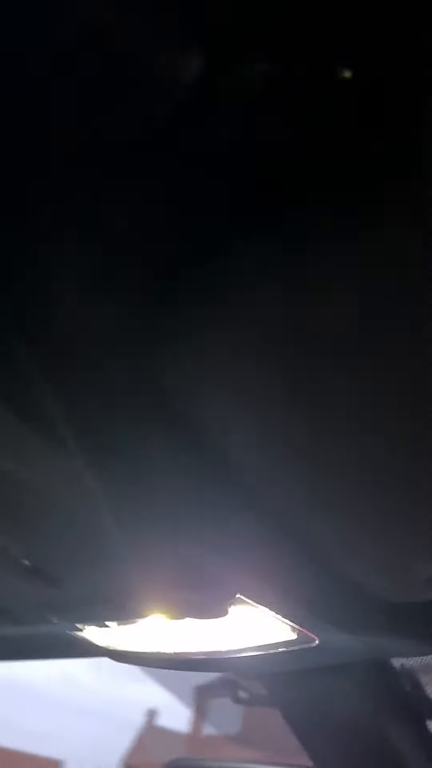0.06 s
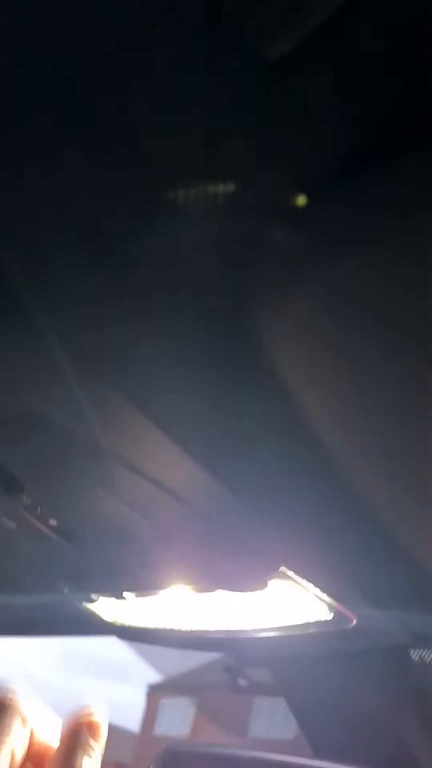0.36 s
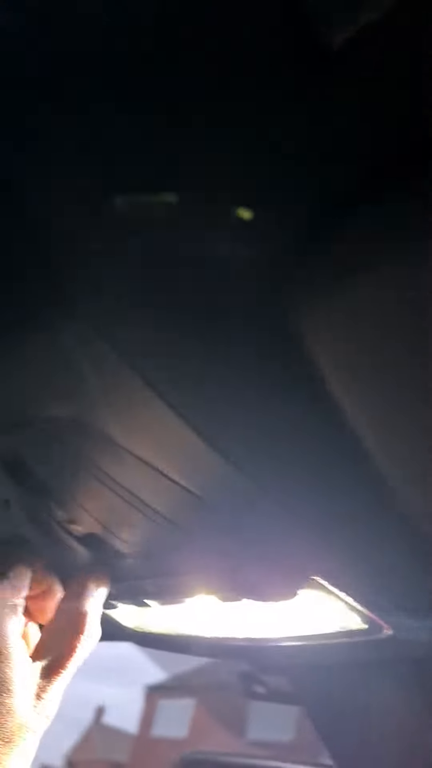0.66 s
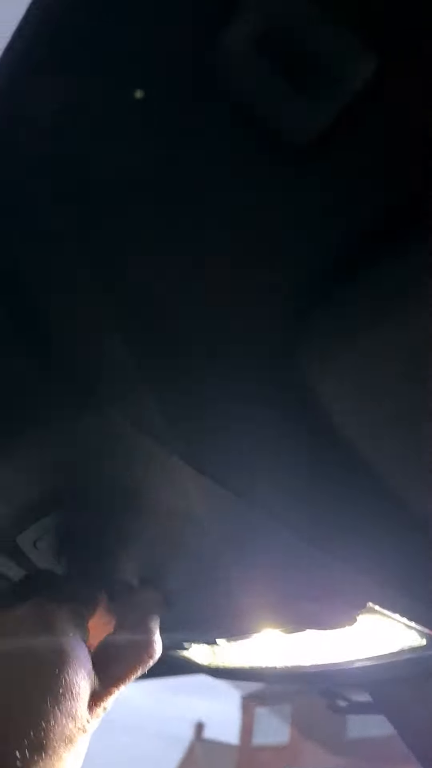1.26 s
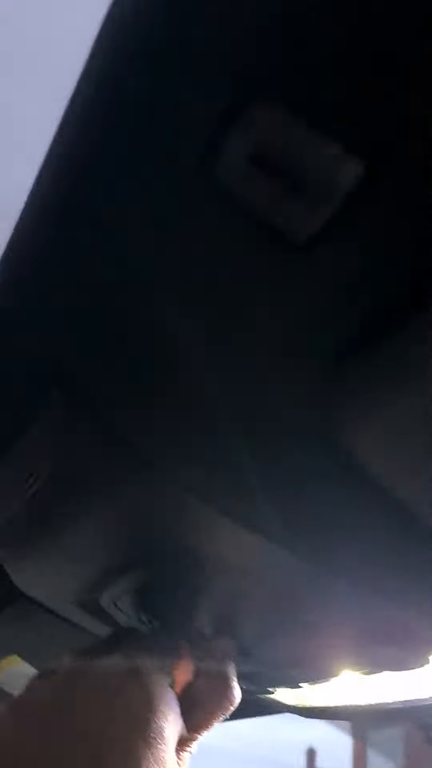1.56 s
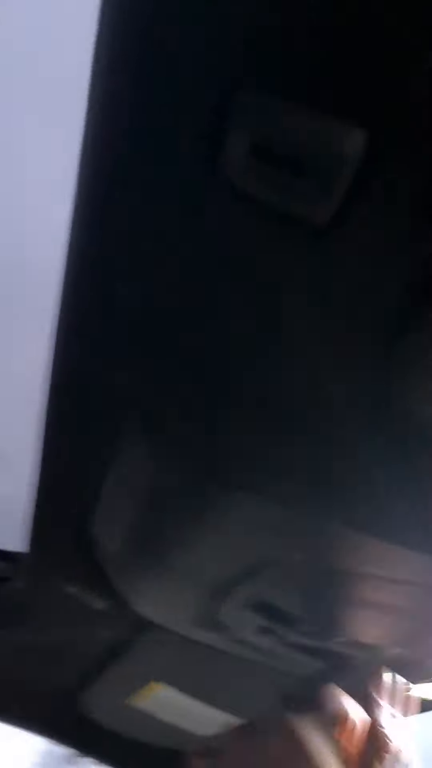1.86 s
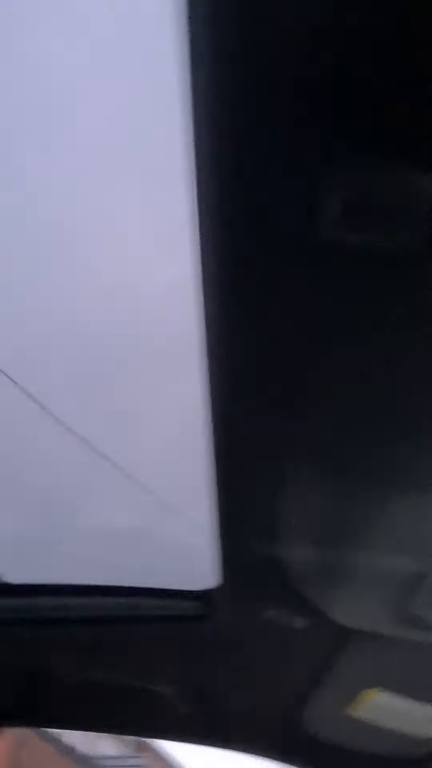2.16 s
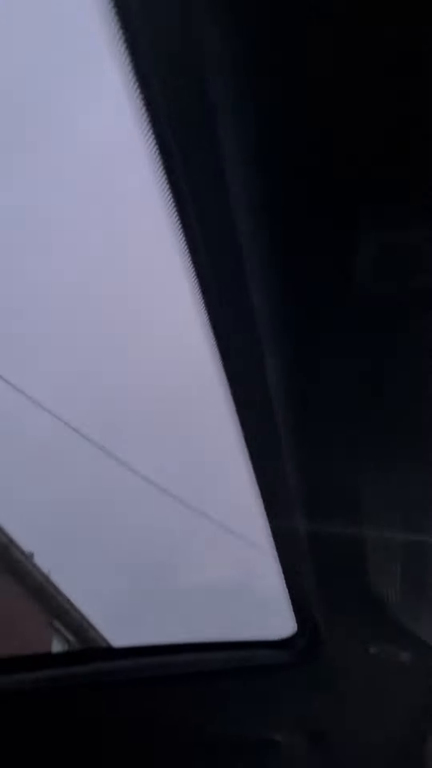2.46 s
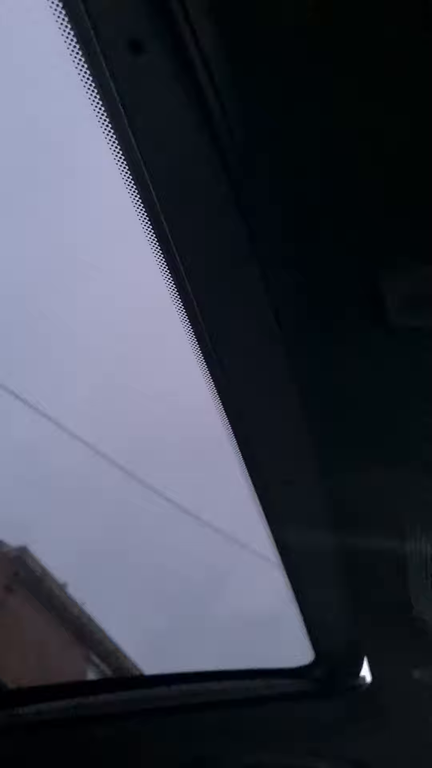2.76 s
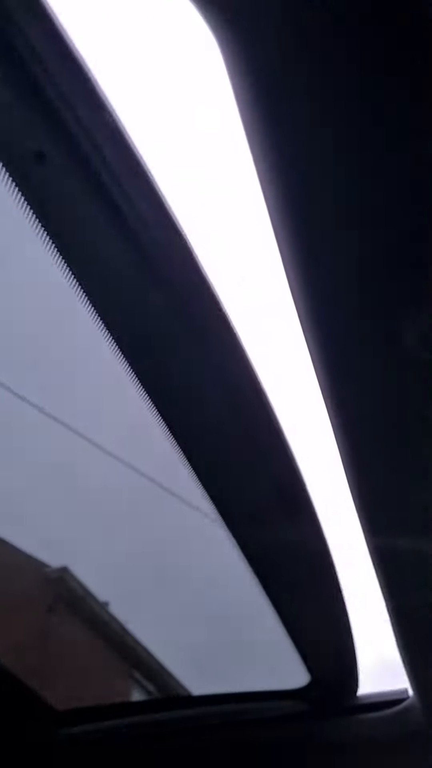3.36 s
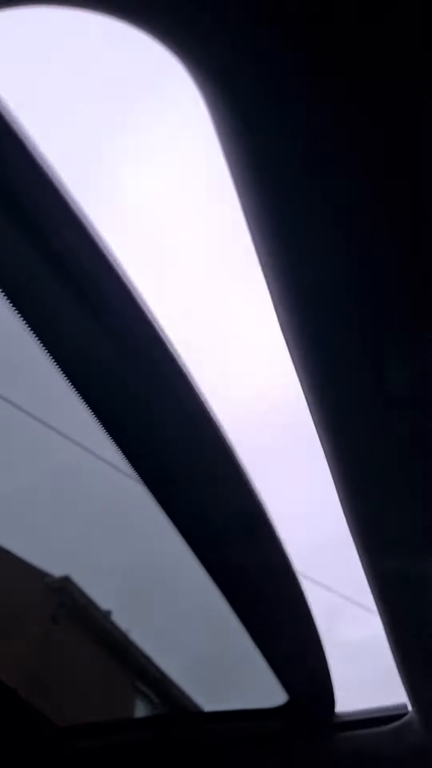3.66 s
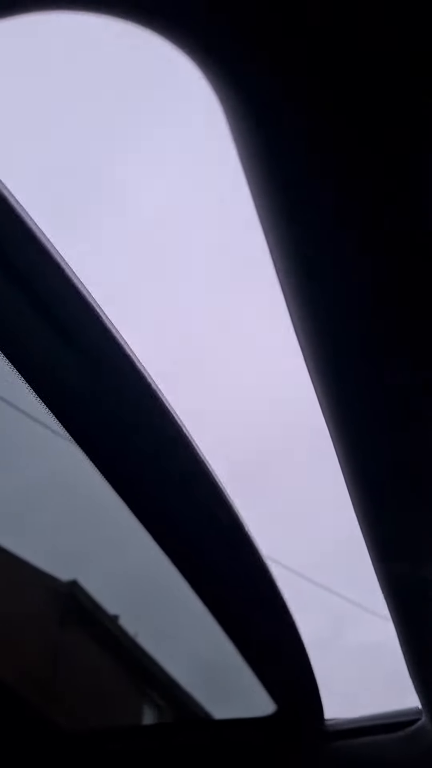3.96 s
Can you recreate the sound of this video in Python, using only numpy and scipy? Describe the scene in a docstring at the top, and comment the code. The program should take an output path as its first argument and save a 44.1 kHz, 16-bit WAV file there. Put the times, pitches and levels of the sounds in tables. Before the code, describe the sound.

An electric sunroof opens inside a parked car, its idling engine booming low throughout. A sleeve rustles faintly, and from 0.7 seconds fingers tap and brush the overhead console, clicking a switch around 1.4 seconds. At 1.6 seconds the motor starts with a clunk, and the latch snaps loudly near 1.9. The seal swishes at 2.2 seconds, then the panel slides with a soft whine and hiss until 4 seconds.

```python
"""Inside a parked car, the idling engine makes the cabin boom. A sleeve rustles upward, brightening as the hand
rises, and from 0.66 s fingers tap the roof console, then click its switch. At 1.6 s the sunroof motor starts
with a clunk, and the panel snaps out of its latch. The seal lets go with a swish as the opening roof vents the
lowest boom. The panel slides back to the end, its gears whining over the hiss of the guide rails."""
import sys
import numpy as np
from scipy import signal
from scipy.fft import rfft, irfft
from scipy.io import wavfile
from scipy.ndimage import map_coordinates

SR = 44100
rng = np.random.default_rng(int(sys.argv[2]) if len(sys.argv) > 2 else 0)


def to_wav(sig):
    """Store sig (one row per channel, or 1-D mono) as 16-bit WAV at the path in sys.argv[1].

    Samples outside -1..1 are clipped; the rate is SR.
    """
    pcm = np.clip(np.atleast_2d(sig), -1, 1) * 32767
    pcm = np.round(pcm).astype(np.int16)
    wavfile.write(sys.argv[1], SR, pcm.T)  # frames by channels


N = 176400
T = np.arange(N) / SR
FREQS = np.maximum(np.fft.rfftfreq(2 * N, 1 / SR), 1)
TOP_HZ = 16100


# Pitch of the gears. Each row: time in seconds, tooth mesh rate in Hz.
MESH_RATE = [(1.61, 380), (1.7, 445), (1.95, 438), (2.3, 464), (2.55, 461), (2.75, 454), (3.0, 450),
             (3.27, 436), (3.45, 438), (3.62, 447), (3.8, 458), (4.0, 452)]
# Panning of the roof. Each row: frequency in Hz, left minus right in dB.
ROOF_PAN = [(200, 5), (700, -1), (1300, -2), (2400, -4), (4400, -10), (8000, 1.5), (15000, -11.5)]
def sunroof(speed_waver=0.00094):
    """The motor turns its gears, pulling the panel off its seal and along the rails."""
    mesh_cycles = np.cumsum(curve(MESH_RATE) * (1 + speed_waver * walk(14))) / SR
    rasp = shaft_rasp(mesh_cycles)
    noise = drive_noise(rasp) + rail_hiss(rasp) + seal_swish()
    roof = gear_whine(mesh_cycles) + shoe_rubs() + rail_ring() + reflected(noise)
    left_gain = np.sqrt(shape(ROOF_PAN))
    return filtered(roof, np.array([left_gain, 1 / left_gain]))


# Whine envelopes. Each row: time in seconds, then the levels of mesh harmonics 1, 2 and 3 in dB.
WHINE_LEVELS = [(1.61, -50, -47, -70), (2.3, -63, -77, -66), (2.85, -53, -59.5, -60), (3.3, -51, -58, -58),
                (3.55, -51.5, -53.5, -67), (3.8, -56.5, -53, -74), (4.0, -56, -56.5, -55)]
def gear_whine(mesh_cycles, flutter_per_s=50, flutter_cycles=.035, flutter_db=2.5, waver_db=4.5):
    """Harmonics of the mesh rate flutter with the uneven bite of the teeth."""
    out, rows = 0, np.array(WHINE_LEVELS)
    bite = mesh_cycles + flutter_cycles * walk(flutter_per_s)
    for k in range(1, rows.shape[1]):
        offset = rng.uniform(0, 1) + np.array([[0], [.25]])  # sides a quarter cycle apart
        level_db = curve(rows[:, [0, k]]) + waver_db * walk(13) + flutter_db * walk(flutter_per_s)
        out = out + np.sqrt(2) * undb(level_db) * np.sin(2 * np.pi * (k * bite + offset))
    return out * (T > LATCH_HITS[0][0])  # silent until the first clunk


def shaft_rasp(mesh_cycles, teeth=8):
    """A rough pattern repeats with every turn of the shaft."""
    roughness = rng.standard_normal((2, 700))
    position = mesh_cycles / teeth % 1 * roughness.shape[1]
    return spread(*[map_coordinates(row, [position], mode="grid-wrap") for row in roughness])


# Colour of the drive. Each row: frequency in Hz, relative level in dB.
DRIVE_EQ = [(100, 3), (200, -1.5), (330, 0.5), (450, -10.5), (560, -2.5), (800, -6), (1150, -5),
            (1600, -14), (3000, -15.5), (4500, -23), (7000, -40), (9000, -41), (15000, -51.5)]
# Its envelope under load. Each row: time in seconds, level in dB.
DRIVE_LEVEL = [(1.6, -71), (1.625, -33.5), (1.72, -38), (1.8, -36.5), (1.85, -28), (1.92, -40),
               (1.97, -39.5), (2.1, -39.5), (2.16, -38), (2.22, -41), (2.8, -45), (3.35, -45), (4.0, -44.5)]
def drive_noise(rasp, rasp_db=-3.5):
    """The drive buzzes, loudest as it strains against the latch."""
    return coloured(air() + undb(rasp_db) * rasp, DRIVE_EQ) * undb(curve(DRIVE_LEVEL) + 1.75 * walk(45))


# Colour of the rails. Each row: frequency in Hz, relative level in dB.
RAIL_EQ = [(500, -3.5), (1500, -0.5), (2800, 3), (4500, -1), (6000, -2), (7200, -13), (8400, -22),
           (9300, -19), (10500, -14.5), (15500, -27)]
# Envelope of the slide. Each row: time in seconds, level in dB.
SLIDE_LEVEL = [(1.6, -90), (2.05, -68), (2.25, -51), (2.65, -47), (3.1, -49), (4.0, -49)]
def rail_hiss(rasp, rasp_db=-19):
    """The sliding panel hisses on its rails, with a trace of shaft rasp."""
    return coloured(air() + undb(rasp_db) * rasp, RAIL_EQ) * undb(curve(SLIDE_LEVEL) + 0.53 * walk(60))


def rail_ring(count=18, low_hz=1601, high_hz=4666, width_hz=60, swell_db=7, against_hiss_db=-9):
    """Narrow resonances of the rails swell and fade as the shoes travel along them."""
    out = 0
    for hz in np.geomspace(low_hz, high_hz, count) * (1 + .02 * rng.standard_normal(count)):
        grain = np.array([walk(width_hz) + 1j * walk(width_hz) for side in range(2)])
        tone = (grain * np.exp(2j * np.pi * hz * T)).real
        out = out + tone * undb(swell_db * np.tanh(walk(11))) / hz
    return unit(out) * undb(curve(SLIDE_LEVEL) + against_hiss_db)


# Faint squeaks. Each row: centre in seconds, half-length in seconds, pitch in Hz, level in dB.
SHOE_RUBS = [(2.27, 0.1, 4130, -54.5), (2.496, .07, 2890, -60), (2.955, 0.031, 2640, -56),
             (3.065, 0.075, 2640, -54.5)]
def shoe_rubs(width_hz=59):
    """The guide shoes sing briefly on the rails in narrow bands of noise."""
    out = 0
    for centre_s, half_s, hz, db in SHOE_RUBS:
        tone = unit(filtered(air(), 1 / (1 + ((FREQS - hz) / width_hz) ** 2)))
        out = out + tone * undb(db) * np.exp(-((T - centre_s) / half_s) ** 2)
    return out


# Colour of the seal. Each row: frequency in Hz, relative level in dB.
SEAL_EQ = [(1000, -11), (2500, -5), (3900, -9), (5200, -16), (9000, -42)]
def seal_swish(centre_s=2.21, half_s=0.05, level_db=-45.5):
    """The seal swishes as it lets go of the glass."""
    return coloured(air(), SEAL_EQ) * undb(level_db) * np.exp(-((T - centre_s) / half_s) ** 2)


# Clunks. Each row: start in seconds, body, mid, treble and top levels in dB, left minus right in dB.
LATCH_HITS = [(1.6135, -35, -44, -36, -45.5, -7.5), (1.624, -50, -42, -52, -65, -1),
              (1.665, -32, -41.5, -49.5, -70, 0), (1.793, -36, -31.5, -35.5, -46.5, -4),
              (1.823, -55, -51, -49, -55, -2), (1.846, -51, -38, -39, -62, 7),
              (1.869, -50, -31, -23, -31, -2), (1.887, -32, -27.5, -26, -29.5, -2),
              (1.9015, -25.5, -22.5, -33.5, -49, -1.5), (1.977, -36.5, -37, -35, -56, -3),
              (2.136, -40, -41.5, -58, -77, 2), (2.164, -47, -48, -57, -75, 3)]
# Ring of the latch. Each row: frequency in Hz, width in Hz, boost in dB.
LATCH_RING = [(276, 280, 4.9), (437, 52, 14.6), (1107, 54, 14), (1306, 100, 11.6), (1460, 71, 7.2),
              (2980, 970, 12.6), (4200, 1300, 12.7), (5500, 1300, 10.5), (8550, 69, 3.2)]
def latch_clunks():
    """The drive engages, the latch snaps and the released panel knocks."""
    return knocks(LATCH_HITS, LATCH_RING, snap_db=-2, tail_stretch=1.22)


# Taps. Each row: start in seconds, body, mid, treble and top levels in dB, left minus right in dB.
SWITCH_HITS = [(.661, -38, -44, -49.5, -76, -2.5), (.6665, -37, -48, -59, -82, -7),
               (.671, -45, -39, -47.5, -72, -2.5), (.975, -50, -49, -67, -89, -6),
               (1.247, -51, -50.5, -42, -75, -6.5), (1.330, -40.5, -43.5, -50, -66, -4.5),
               (1.4065, -47, -41, -31.5, -33, -3.5), (1.511, -32.5, -36, -45.5, -64, -6.5)]
# Ring of the console. Each row: frequency in Hz, width in Hz, boost in dB.
CONSOLE_RING = [(467, 42, 1), (767, 30, 9), (1250, 390, 15.5), (3150, 1400, 19.5), (4150, 520, 14),
                (4780, 1000, 22.5), (5920, 610, 17.5), (7260, 270, -2)]
def switch_clicks():
    """Finger taps and switch clicks ring through the roof console."""
    return knocks(SWITCH_HITS, CONSOLE_RING, snap_db=-5.5, tail_stretch=1.0)


# Voicing of a knock. Each list runs body, mid, treble, top. In turn: band centre in Hz, tail decay in
# seconds before stretching, crack against the tail in dB, click against the tail in dB before snap_db.
BAND_HZ = [350, 1250, 4500, 12000]
BAND_T60_S = [0.12, 0.067, 0.077, 0.08]
BAND_CRACK_DB = [-31, -8.5, -0.5, -2]
BAND_CLICK_DB = [4.8, 12, 22, 28]
def knocks(hits, modes, snap_db, tail_stretch, crack_s=0.0015, left_lag_s=.00015):
    """Each blow is a click, a brief crack and a short cabin tail, rung through the struck part."""
    ring = 1 + sum((undb(db) - 1) / (1 + (2 * (FREQS - hz) / width) ** 2) for hz, width, db in modes)
    edges = np.sqrt(np.array(BAND_HZ[:-1]) * BAND_HZ[1:])
    age, out = T[:SR // 4], 0
    for k, (low, high) in enumerate(zip([190, *edges], [*edges, TOP_HZ])):
        power, clicks = np.zeros((2, 2, N))
        tail = np.exp(-np.log(1000) * age / (tail_stretch * BAND_T60_S[k]))
        crack = undb(BAND_CRACK_DB[k]) * np.exp(-age / crack_s)
        for start, *band_db, pan_db in hits:
            i = int(start * SR)
            size = undb(band_db[k] + np.array([pan_db, -pan_db]) / 2)
            power[:, i:i + len(age)] += np.outer(size, tail + crack) ** 2
            clicks[[0, 1], [i + int(left_lag_s * SR), i]] += size * undb(BAND_CLICK_DB[k] + snap_db)
        band = ring / np.sqrt((1 + (low / FREQS) ** 10) * (1 + (FREQS / high) ** 10))
        out = out + filtered(clicks + air() * np.sqrt(power), causal(unit(band)))
    return out


# Pitched knocks. Each row: start in seconds, pitch in Hz, peak level in dB, attack in seconds.
THUMP_HITS = [(0.664, 53.7, -26, 0.024), (.667, 1263, -36, 0.0045), (1.332, 460, -30, 0.0033),
              (1.5093, 1292, -26, 0.0023), (1.513, 719, -37, .006), (1.516, 277, -32.5, 0.0068),
              (1.6145, 290, -18.3, 0.0033), (1.6233, 1110, -24.5, 0.0016), (1.631, 140, -42, 0.025),
              (1.783, 346, -27.5, 0.0033), (1.833, 373, -27.5, 0.013), (1.865, 130.4, -29, 0.019),
              (1.882, 42.6, -30, 0.045), (1.886, 5720, -27.5, 0.0042), (2.001, 35.8, -30, 0.058),
              (2.136, 630, -39, 0.0029), (2.14, 241, -36, 0.012)]
def thumps():
    """Roof lining, console, latch and spring each swing at their own pitch when pushed, then die away."""
    out = 0
    for start, hz, db, attack_s in THUMP_HITS:
        age = np.maximum(T - start, 0)
        envelope = age / attack_s * np.exp(1 - age / attack_s)
        out = out + undb(db) * envelope * np.sin(2 * np.pi * hz * age)
    return out


# Colour of the brighter rustle. Each row: frequency in Hz, relative level in dB.
GRAIN_EQ = [(900, -19), (2400, -14), (3250, 5.5), (3900, 1.5), (4800, 4), (5600, -3.5), (7000, -10.5),
            (8200, -12), (9200, -34), (10500, -23), (15000, -24)]
def sleeve_grain(start_s=0.81, end_s=1, fade_s=0.014, level_db=-54.5):
    """The sleeve rustles brighter as the hand rises, catching and slipping on its grain."""
    touch = (np.tanh((T - start_s) / fade_s) - np.tanh((T - end_s) / fade_s)) / 2
    scratch = air() * undb(3.5 * walk(200))
    return coloured(reflected(scratch), GRAIN_EQ) * touch * undb(level_db + walk(59))


# Colour of the cloth. Each row: frequency in Hz, relative level in dB.
SLEEVE_EQ = [(600, -5), (1500, -0.5), (2400, 1), (3300, 0.5), (4800, -4.5), (6200, -10.5), (7200, -28.5),
             (9200, -18.5), (10200, -14), (11500, -20), (15000, -28)]
# Its envelope. Each row: time in seconds, level in dB.
SLEEVE_LEVEL = [(0, -71.5), (.25, -67), (.35, -64.5), (.62, -59.5), (.75, -60.5), (.95, -54.5), (1.02, -94),
                (1.2, -64), (1.6, -66)]
def sleeve_rustle():
    """Cloth rustles as the arm reaches up."""
    return coloured(reflected(air()), SLEEVE_EQ) * undb(curve(SLEEVE_LEVEL) + 2.3 * walk(42))


# Cabin boom. Each row: multiple of the firing rate, relative level in dB.
BOOM_HARMONICS = [(1, -1.5), (2, 1), (3, -1.36), (4, -7), (6, -9), (7, -11), (10, -22.5), (11, -27.5),
                  (13, -22.5)]
# Bed of engine and fan noise. Each row: frequency in Hz, relative level in dB.
CABIN_EQ = [(20, 5.5), (45, 7), (100, 0), (200, -6.5), (380, -7), (550, -18), (1000, -26.5), (2000, -37),
            (4500, -42), (6500, -58.5), (9000, -75), (16000, -59)]
def engine_idle(firing_hz=28.85, resonance_hz=102, width_hz=8, boom_db=-32, rush_db=-39.5, vent_db=-10):
    """Even firings make the cabin boom and its noise throb; the lowest tone leaks out of the open roof."""
    firings = np.cumsum(firing_hz * (1 + 0.0005 * walk(2.3))) / SR - firing_hz * .0003
    opened = curve([(1.95, 0), (2.45, 1)])
    right_lag = 2 * np.pi * firing_hz * np.array([[0], [0.00052]])
    boom = 0
    for k, db in BOOM_HARMONICS:
        hz = k * firing_hz
        # harmonics above the cabin's resonance swing the other way
        lag = np.arctan2(width_hz * hz, resonance_hz ** 2 - hz ** 2) + right_lag
        level_db = db + vent_db * opened * (k == 1) + 0.6 * walk(7.4)
        boom = boom - undb(level_db) * np.cos(2 * np.pi * k * firings - lag)
    rush = coloured(air(), CABIN_EQ) * (1 + 0.12 * np.cos(2 * np.pi * firings))
    pan_db = np.array([[-.25], [.25]])
    return undb(boom_db + pan_db) * unit(boom) + undb(rush_db) * rush


def reflected(x, echo_db=-15.5, span_s=.014):
    """Early echoes from glass and trim ripple the spectrum, differently on each side."""
    taps = [pulses(rng.uniform(0.00087, span_s, size=24), rng.standard_normal(24)) for side in range(2)]
    taps = np.array([tap / np.linalg.norm(tap) for tap in taps])
    return x + undb(echo_db) * filtered(x, rfft(taps, 2 * N))


def air():
    """Diffuse white noise in the cabin."""
    return spread(*rng.standard_normal((2, N)))


def spread(mid, side, corner_hz=450, width=0.97, bass_share=0.3):
    """Two channels, alike in the bass and diffuse in the treble."""
    side_gain = width * (FREQS ** 2 + bass_share * corner_hz ** 2) / (FREQS ** 2 + corner_hz ** 2)
    side = filtered(side, side_gain)
    return np.array([mid + side, mid - side])


def undb(db):
    """Decibels to gain."""
    return 10 ** (np.asarray(db) / 20)


def unit(x):
    """Scale to rms 1."""
    return x / np.sqrt(np.mean(x ** 2))


def curve(points):
    """Straight lines through (s, value) points."""
    return np.interp(T, *np.array(points, float).T)


def shape(points):
    """Gain at every frequency from (Hz, dB) points."""
    hz, db = np.array(points, float).T
    return undb(np.interp(np.log(FREQS), np.log(hz), db))


def causal(gain):
    """The causal filter that has this gain."""
    cepstrum = irfft(np.log(gain + 1e-6))
    cepstrum[1:N] *= 2
    cepstrum[N + 1:] = 0
    return np.exp(rfft(cepstrum))


def filtered(x, response):
    """Pass a sound through a frequency response."""
    return irfft(rfft(x, 2 * N) * response)[..., :N]


def coloured(x, eq):
    """Equalise a sound and scale it to rms 1."""
    return unit(filtered(x, shape(eq)))


def walk(steps_per_s):
    """Smooth random drift, spread near 1."""
    knots = rng.standard_normal(1024)
    return np.interp(T * steps_per_s, np.arange(len(knots)), knots)


def pulses(times, sizes):
    """Single impulses, each shared between two samples."""
    at = np.clip(times * SR, 0, N)
    i = at.astype(int)
    before = np.bincount(i, sizes * (1 - at + i), N + 2)
    after = np.bincount(i + 1, sizes * (at - i), N + 2)
    return (before + after)[:N]


def scene():
    """Everything heard from the front seat."""
    blows = switch_clicks() + latch_clunks() + thumps()
    return blows + engine_idle() + sleeve_rustle() + sleeve_grain() + sunroof()


# Colour of the microphone. Each row: frequency in Hz, gain in dB.
MIC_EQ = [(20, 1), (8400, -3.5), (9000, -14), (9600, -6), (10500, -3), (16000, -3.5)]
def record(dry):
    """The microphone has a notch in the treble; the top is cut."""
    high_cut = signal.ellip(8, .2, 70, TOP_HZ, fs=SR, output="sos")
    return signal.sosfilt(high_cut, filtered(dry, causal(shape(MIC_EQ))))


dry = scene()
out = record(dry)
to_wav(out)
```